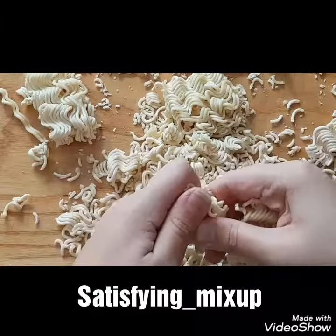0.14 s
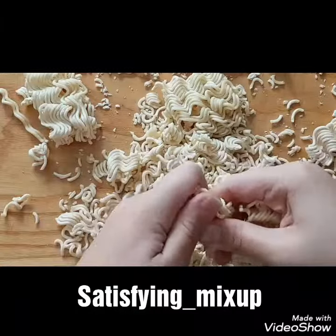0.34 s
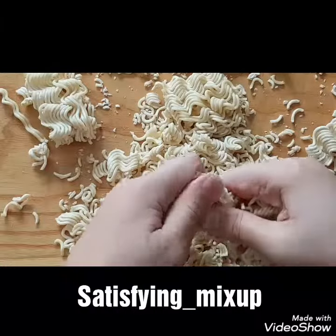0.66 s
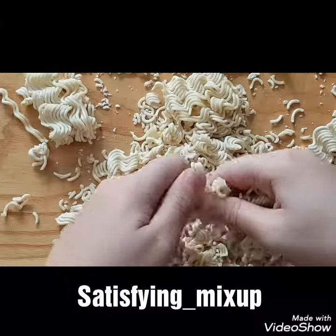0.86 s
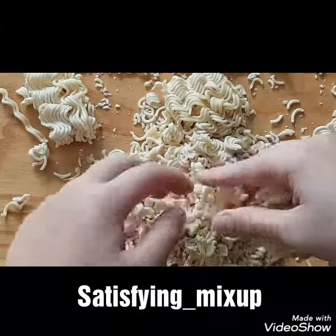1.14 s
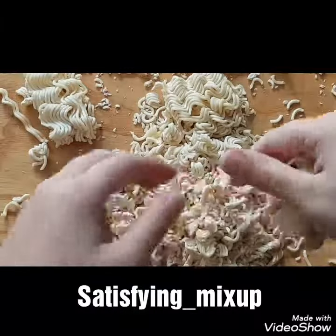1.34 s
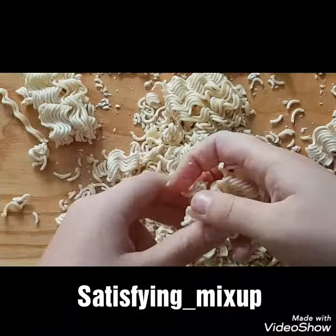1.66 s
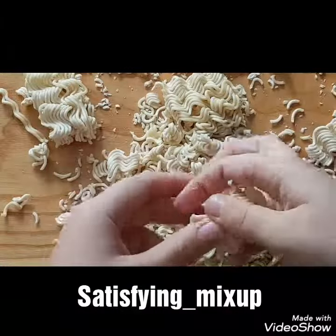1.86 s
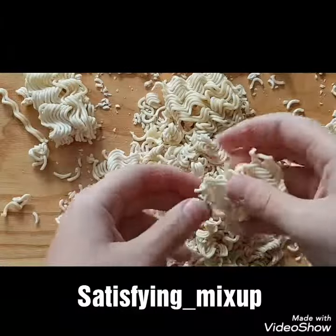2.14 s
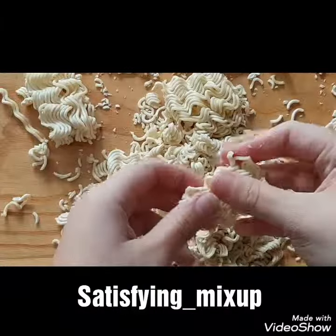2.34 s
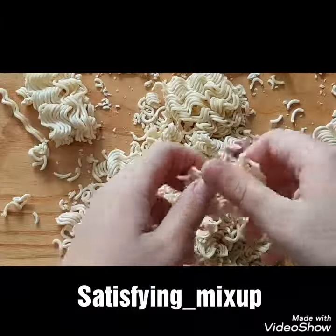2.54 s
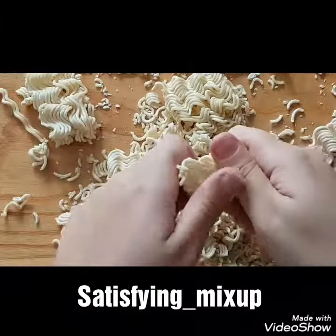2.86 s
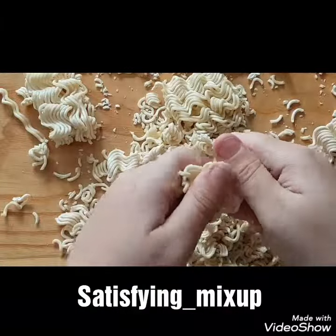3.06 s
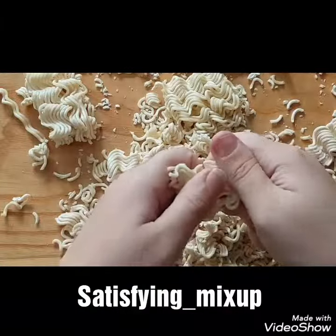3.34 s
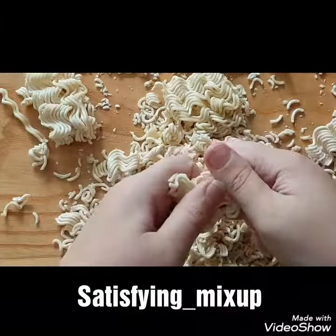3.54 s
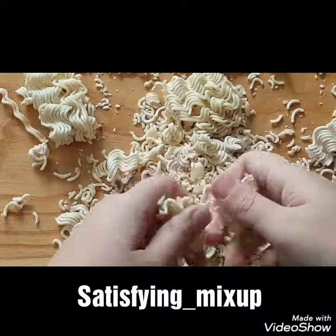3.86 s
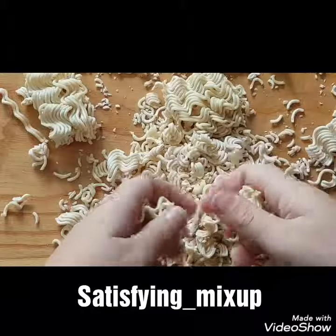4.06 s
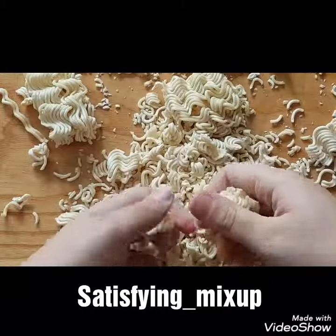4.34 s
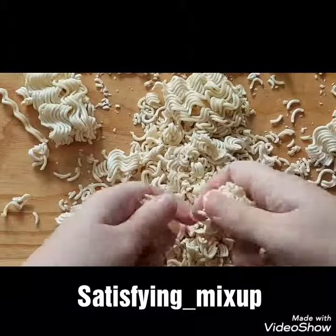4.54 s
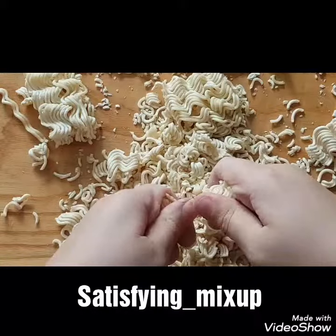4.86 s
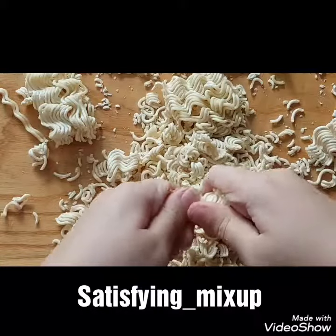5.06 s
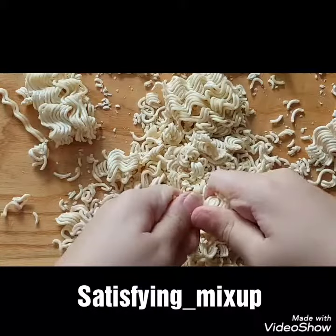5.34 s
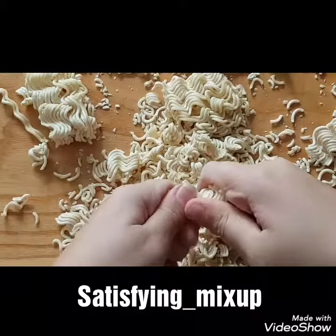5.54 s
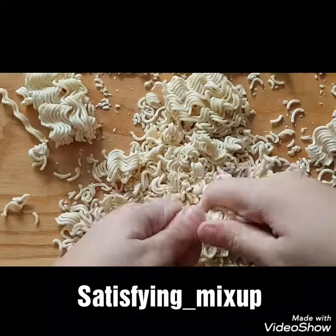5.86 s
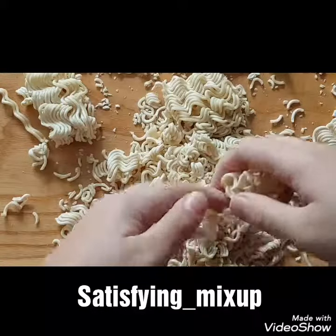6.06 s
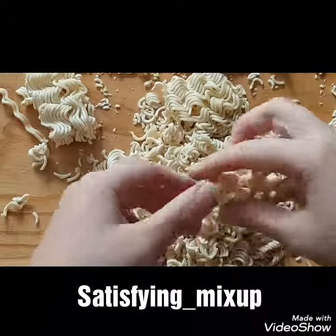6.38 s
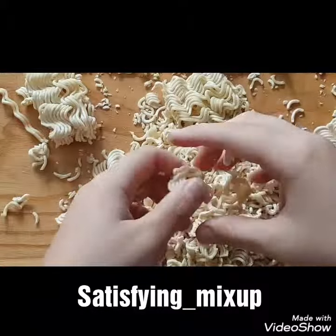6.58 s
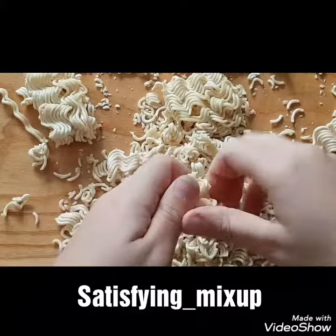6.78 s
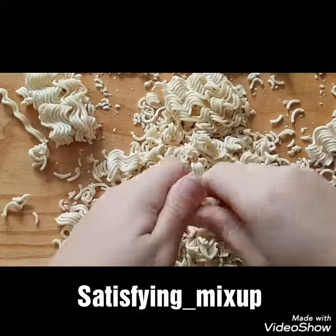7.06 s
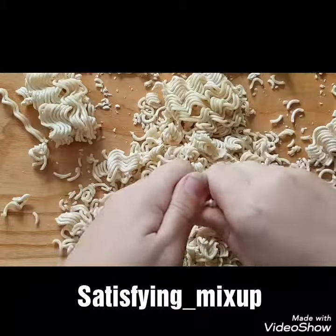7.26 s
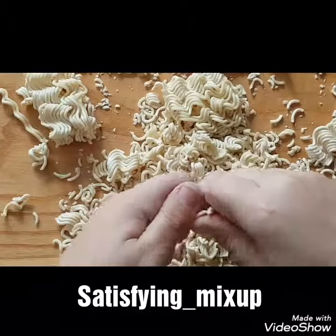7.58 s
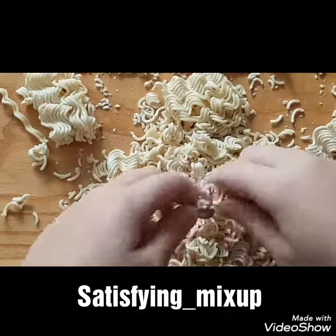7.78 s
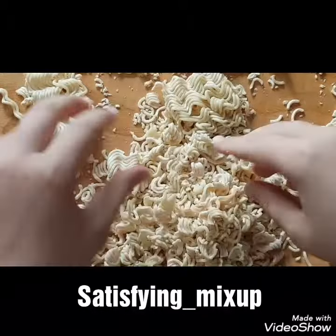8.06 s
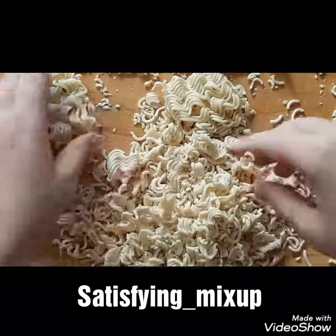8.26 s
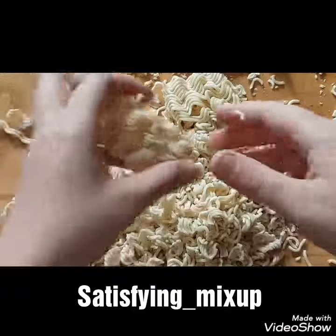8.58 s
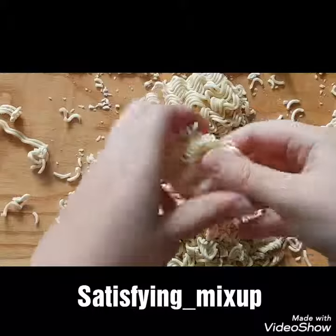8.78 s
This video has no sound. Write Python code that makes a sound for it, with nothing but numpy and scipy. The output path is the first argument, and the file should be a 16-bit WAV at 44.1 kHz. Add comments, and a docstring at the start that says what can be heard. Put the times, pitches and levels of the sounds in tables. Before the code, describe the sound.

Dry noodle strands crack between fingertips with bright, short snaps and gritty crumb crackle. Busy crunching in the first second fades to light pattering; later bursts are separated by soft grinding lulls. One strong snap stands out midway. Loose bits tick on the heap and faintly ring the tabletop, with a few soft thuds and scrapes. Close phone microphone, small furnished room, low background hush, centred sound.

```python
"""Faint crumb crackle in a quiet room, at once broken by snaps: two hands break and crumble a block of
dry instant noodles just above a wooden table, close to a phone.
Each fracture is a run of tiny slips that rings the strand, spits treble and jolts the fingers.
Crumbs are streams of noise bursts that crackle between the fingertips, with larger ones crunching.
Pieces tick on the heap and ring the table modes, crumbs trickle after them; dull thuds, a knock and
scrapes on the wood are swells of dense noise bursts."""
import sys
import numpy as np
from scipy import signal
from scipy.fft import rfft, irfft
from scipy.io import wavfile
from scipy.ndimage import uniform_filter1d

SR = 44100
rng = np.random.default_rng(int(sys.argv[2]) if len(sys.argv) > 2 else 0)


def file_out(sig):
    """Save sig as 16-bit WAV at sys.argv[1]."""
    # one column per channel
    cols = np.atleast_2d(sig).T
    # limit, then scale
    lim = np.clip(cols, -1, 1)
    pcm = np.round(lim * 32767).astype(np.int16)
    wavfile.write(sys.argv[1], SR, pcm)


N = 393372
TIME_S = np.arange(N) / SR

# strand breaks: t/s, ring rms over 5 ms/dB, crack re ring/dB, tear length/s
BREAKS = [(0.051, -50, 3.5, 0.00024), (0.0838, -36.5, -2.5, 0.00035), (0.1712, -40.5, -6.5, 0.00036),
          (0.199, -47, -8, 0.00041), (0.2649, -50, 1, 0.000046), (0.286, -39.5, -13, 0.00035),
          (0.2985, -36.5, 2.5, 0.00056), (0.3091, -28, -1, .0019), (0.3186, -34.5, -4, 0.00047),
          (0.549, -32, -20, 0.00053), (0.5531, -35.5, -29, 0.00052), (0.7199, -35, -12, 0.00062),
          (0.7518, -40.5, -11, 0.0016), (0.7894, -45, -6, 0.00059), (3.1376, -44, -14.5, 0.00054),
          (3.2734, -33.5, -1.5, 0.00094), (3.328, -47, -20, 0.000082), (3.4353, -40.5, -15, 0.000069),
          (3.5487, -47.5, -11, 0.00018), (3.607, -37.5, -11.5, 0.00078), (4.8638, -44.5, -8, 0.000035),
          (5.01, -19.5, -17.5, 0.00025), (5.0121, -30.5, -12, 0.00021), (5.0406, -34.5, -5, 0.00011),
          (5.0515, -41.5, -9, 0.00032), (5.205, -38.5, -9, 0.00047), (5.2215, -35, -30, 0.00022),
          (5.4832, -35.5, -13, .00004), (5.4977, -36, -12, 0.00017), (5.5273, -32.5, -13, 0.00017),
          (5.567, -38, -18, 0.00017), (5.6963, -45.5, -20, .0001), (7.383, -43.5, -11.5, .0001),
          (7.3966, -34, -5, 0.0012), (7.399, -31.5, -6.5, 0.0011), (7.4052, -33.5, -19, 0.00025),
          (7.436, -38.5, -10.5, 0.00063), (7.6247, -38.5, -19, 0.00082), (8.2663, -34.5, -15, 0.00061)]
# pieces let go over the table: t/s, level before mix gains/dB, loose crumbs re that level/dB
DROPPED_PIECES = [(1.071, -50, -11.5), (1.19, -51, -2), (1.256, -45.5, -7.5), (2.024, -47.5, -17),
                  (3.983, -55, -10), (4.239, -50.5, -16), (4.462, -57.5, -5), (6.258, -48, -8.5),
                  (6.33, -52, -7.5), (6.48, -55.5, -15), (6.685, -51, -12), (6.725, -45.5, -7.5),
                  (7.934, -56, -16), (8.001, -53, -1.5), (8.056, -52.5, -6), (8.404, -51, -20),
                  (8.469, -54.5, -5.5)]
# nominal table-top modes: f/Hz, level/dB, t60/s
TABLE_MODES = [(318.8, 2, 0.2), (250, -9.5, 0.084), (403, -3.5, 0.037), (517, -9.5, 0.058),
               (730, -16.5, 0.083), (814, -10, 0.047), (958, -15.5, 0.1), (1182, -15, 0.07),
               (1480, -16.5, 0.048), (1700, -24, 0.064)]
# larger crumbs crushed between the fingertips: t/s, level before mix gain/dB
CRUSHED_CRUMBS = [(0.25, -45), (0.3597, -34.5), (0.4343, -32.5), (0.5184, -38), (0.588, -34.5),
                  (0.6481, -41), (0.6952, -30), (0.824, -36), (0.852, -39), (1.48, -40.5), (1.5463, -43),
                  (1.6075, -46.5), (2.13, -47), (3.4523, -34.5), (5.1578, -40.5), (5.3844, -38.5),
                  (6.0354, -42), (7.2982, -43), (7.646, -40), (8.8487, -43.5)]
# dull thuds, a knock (8.4 s) and scrapes on the wood: t/s, length/s, level before mix gain/dB
WOOD_CONTACTS = [(1.508, 0.034, -48), (1.601, 0.073, -58), (7.767, 0.094, -58), (8.4, 0.021, -46),
                 (8.45, 0.2, -60)]
# fingers tighten on the crumbs, then ease off: start t/s, build-up/s, crackle level before mix gain/dB
GRIP_SQUEEZES = [(0.0, 0.065, -72.5), (0.32, 0.063, -59.5), (0.5, .2, -56), (0.9, 0.063, -62),
                 (1.78, 0.089, -72), (3.3, 0.11, -73.5), (3.9, 0.36, -72.5), (5.0, .22, -71),
                 (5.6, 0.14, -70), (6.0, 0.29, -68), (7.6, 0.19, -66), (8.8, 0.13, -71.5)]

# treble spectrum of a strand cracking: f/Hz, relative density/dB
CRACK_SPECTRUM = [(1500, -27), (3500, -2), (5200, -5), (7200, 4.5), (9000, -2), (11000, -2), (14500, 0),
                  (16200, -17.5)]
# low spectrum of the jolt in the fingers: f/Hz, relative density/dB
JOLT_SPECTRUM = [(60, -15.5), (150, -3), (280, -1.5), (600, -6.5), (1300, -7), (2200, -13), (5000, -27)]
# hollow crumb rasp spectrum: f/Hz, relative density/dB
CRUMB_SPECTRUM = [(120, -8.5), (350, -3.5), (1500, -7.5), (2200, -4.5), (2750, -2), (3800, -6), (5200, -16),
                  (9000, -19.5), (16000, -32)]
# fine, bright crumb spectrum: f/Hz, relative density/dB
FIZZ_SPECTRUM = [(2000, -23), (4000, -6), (7000, 3.5), (13500, 0), (16200, -20)]
# noodle-curl rattle spectrum: f/Hz, relative density/dB
CURL_SPECTRUM = [(600, -28), (1600, -14.5), (2300, -1.5), (3100, 0), (4300, -2), (5400, -20.5),
                 (12000, -42)]
# spectrum of the thuds, knock and scrapes on the wood: f/Hz, relative density/dB
WOOD_SPECTRUM = [(60, 0), (140, 5.5), (400, 5.5), (900, -0.5), (1600, 1), (3600, -5.5), (4800, -29),
                 (16000, -29)]
# room-tail spectrum: f/Hz, relative density/dB
ROOM_SPECTRUM = [(700, -0.5), (3000, -5.5), (15000, -2)]
# room noise and microphone hiss spectrum: f/Hz, relative density/dB
HUSH_SPECTRUM = [(20, -8.5), (35, -19), (100, -3.5), (200, -10), (420, -13.5), (1100, -23), (2700, -33),
                 (5000, -38.5), (14000, -41.5), (16500, -51.5)]

HUSH_DB, TOP_HZ = -70.5, 16000
EASE_T60_S, HOLDING_DB = 1.45, -80.5  # release of a squeeze; crackle of a resting grip before mix gain
# typical break: louder ones are thicker strands, ring lower; long tears shatter smaller, ring higher
RING_HZ, TYPICAL_DB, TYPICAL_CRACK_DB, TYPICAL_TEAR_S = 3286, -36, -8.5, 0.00037
RING_FALL_OCT_PER_DB, RING_RISE_OCT_PER_DOUBLING, RING_SCATTER_OCT = 0.03, 0.071, 0.03
# jolt re ring; grows per doubling of tear length and per dB of crack
JOLT_DB, JOLT_DB_PER_DOUBLING, JOLT_DB_PER_CRACK_DB = -8, 2.5, 0.18


def undb(db):
    """Convert dB to amplitude."""
    return 10 ** (np.asarray(db) / 20)


def unit(x):
    """Scale to an energy of one."""
    return x / np.sqrt(np.sum(x ** 2) + 1e-18)


def add(track, t_s, sound):
    """Mix a sound in at a time."""
    i = max(int(t_s * SR), 0)
    track[i:i + len(sound)] += sound[:N - i]


def response(points, size=2048):
    """Minimum-phase impulse response of a spectrum, via a folded cepstrum; energy one."""
    hz, db = np.transpose(points)
    f_hz = np.maximum(np.fft.rfftfreq(size, 1 / SR), 1)
    magnitude = undb(np.interp(np.log(f_hz), np.log(hz), db))
    cepstrum = irfft(np.log(magnitude))
    cepstrum[1:size // 2] *= 2
    cepstrum[size // 2 + 1:] = 0
    return unit(irfft(np.exp(rfft(cepstrum))))


def through(x, impulse_response):
    """Convolve, keeping the input length."""
    return signal.fftconvolve(x, impulse_response)[:len(x)]


def band(x, low_hz, high_hz):
    """Keep one band of a sound."""
    edges_hz = [low_hz, min(high_hz, SR / 2 - 1)]
    return signal.sosfilt(signal.butter(2, edges_hz, "band", fs=SR, output="sos"), x)


def fade(t_s, t60_s):
    """Exponential decay, 60 dB per t60."""
    return np.exp(-np.log(1000) * t_s / t60_s)


def mode(t_s, hz, t60_s):
    """One struck resonance: a decaying sine."""
    return np.sin(2 * np.pi * hz * t_s) * fade(t_s, t60_s)


def walk(rate_hz):
    """Random levels, held and slewed; spread near one."""
    hold = int(SR / rate_hz)
    steps = np.repeat(rng.standard_normal(N // hold + 1), hold)
    return uniform_filter1d(steps, hold)[:N]


def grains(per_s, spread_db):
    """Random impulses of unit power: many small ones, a few large."""
    size = undb(spread_db * np.minimum(rng.exponential(size=N), 4))
    hits = rng.random(N) < per_s / SR
    return unit(hits * size * rng.choice([-1, 1], N)) * np.sqrt(N)


def roughen(impulses, t60_s, size=1024):
    """Turn each impulse into its own short burst of noise."""
    power = through(impulses ** 2, fade(TIME_S[:size], t60_s) ** 2)
    return np.sqrt(abs(power)) * rng.standard_normal(len(impulses))


def grit(per_s, spread_db, t60_s):
    """A stream of rough contacts with unit power."""
    return unit(roughen(grains(per_s, spread_db), t60_s)) * np.sqrt(N)


def burst(spectrum, t60_s, size=2048):
    """A short puff of noise from one rough contact; energy one."""
    noise = rng.standard_normal(size) * fade(TIME_S[:size], t60_s)
    return unit(through(noise, response(spectrum)))


def hush():
    """Steady low room noise and microphone hiss: filtered white noise."""
    return undb(HUSH_DB) * through(rng.standard_normal(N), response(HUSH_SPECTRUM, size=8192))


def grip():
    """Crackle level in dB: each squeeze builds up steadily and dies away."""
    power = undb(HOLDING_DB) ** 2
    for t_s, build_s, db in GRIP_SQUEEZES:
        build = np.clip((TIME_S - t_s) / build_s, 0, 1)
        ease = fade(np.maximum(TIME_S - t_s - build_s, 0), EASE_T60_S)
        power = power + (undb(db) * build * ease) ** 2
    return 10 * np.log10(power)


def crumbs(crumb_db=0.5, fizz_db=-7, tick_db=-12, wobble_db=2, wobble_hz=30):
    """Crumbs grind in fits and starts: hollow rasp, brighter fine ticks, now and then a curl breaking."""
    rasp = through(grit(310, 3.5, 0.0087), response(CRUMB_SPECTRUM))
    fizz = through(grit(140, 5.3, 0.022), response(FIZZ_SPECTRUM))
    ticks = through(grit(22, 4, 0.004), response(CURL_SPECTRUM))
    pressure_db = grip() + wobble_db * walk(wobble_hz)
    return (rasp + undb(fizz_db) * fizz + undb(tick_db) * ticks) * undb(pressure_db + crumb_db)


def fracture(hz, crack_db, jolt_db, tear_s, ring_t60_s=0.0035, curl_db=-8, curl_t60_s=0.016,
             crack_t60_s=0.0099, strain_db=-19, strain_t60_s=0.029, count=14, size=2048):
    """One break: small slips around a main one, which comes a quarter of the way into the sound."""
    t_s = TIME_S[:size]
    main = size // 4
    slips = np.zeros(size)
    offset = rng.normal(0.3, 1.5, count) * tear_s * SR
    place = np.clip(main + offset, 0, size - 1).astype(int)
    # short tear: nearly one clean slip; long tear: a ragged run
    slips[place] = 0.4 * min(tear_s / 0.0006, 1) ** 2 * rng.standard_normal(count)
    slips[main] = 1

    # the strand rings briefly between the fingers; the curls around it rattle
    ring = unit(band(through(slips, mode(t_s, hz, ring_t60_s)), 1400, 7000))
    rattle = unit(through(roughen(slips, curl_t60_s), response(CURL_SPECTRUM)))

    # fine cracks gather just before the strand gives way
    gathering = fade(abs(t_s - t_s[main]), strain_t60_s) * (t_s < t_s[main])
    strain = unit(through(rng.standard_normal(size) * gathering, response(CRACK_SPECTRUM)))
    crack = unit(through(slips, burst(CRACK_SPECTRUM, crack_t60_s))) + undb(strain_db) * strain

    # every slip pushes the same way, so the low jolt adds up; then the fingers spring back
    jolt = unit(band(through(abs(slips), response(JOLT_SPECTRUM)), 45, 4000))
    return ring + undb(curl_db) * rattle + undb(crack_db) * crack + undb(jolt_db) * jolt


def snaps():
    """All strand breaks; loudness, tear and crack set the pitch of the ring and the jolt."""
    out = np.zeros(N)
    span = np.sqrt(0.005 * SR)  # unit energy to unit rms over 5 ms
    for t_s, db, crack_db, tear_s in BREAKS:
        doublings = np.log2(tear_s / TYPICAL_TEAR_S)
        octaves = RING_RISE_OCT_PER_DOUBLING * doublings
        octaves -= RING_FALL_OCT_PER_DB * (db - TYPICAL_DB)
        octaves += RING_SCATTER_OCT * rng.normal()
        jolt_db = JOLT_DB + JOLT_DB_PER_DOUBLING * doublings
        jolt_db += JOLT_DB_PER_CRACK_DB * (crack_db - TYPICAL_CRACK_DB)
        sound = fracture(RING_HZ * 2 ** octaves, crack_db, jolt_db, tear_s)
        add(out, t_s - (len(sound) // 4) / SR, span * undb(db) * sound)
    return out


def splinters(splinter_db=-19.5, t60_s=0.17, size=4096):
    """Weakened strands go on splitting for a moment after each break, more so after a long tear."""
    power = np.zeros(N)
    decay = fade(TIME_S[:size], t60_s)
    for t_s, db, crack_db, tear_s in BREAKS:
        level = undb(db + crack_db + splinter_db)
        add(power, t_s, (level * decay) ** 2 * min(tear_s / 0.00042, 2))
    return np.sqrt(power) * through(grit(1300, 14, 0.013), response(CRACK_SPECTRUM))


def crunches(crunch_db=11, fizz_db=-9, length_s=0.012, rest_db=-10, t60_s=0.0032, rest_t60_s=0.016, count=4):
    """A crumb gives way with a sharp tick, then collapses in a few softer ones."""
    out = np.zeros(N)
    for t_s, db in CRUSHED_CRUMBS:
        tick = burst(CRUMB_SPECTRUM, t60_s) + undb(fizz_db) * burst(FIZZ_SPECTRUM, t60_s)
        add(out, t_s, undb(db + crunch_db) * tick)
        for _ in range(count):
            softer = undb(db + crunch_db + rest_db) * burst(CRUMB_SPECTRUM, rest_t60_s)
            add(out, t_s + length_s * rng.random(), softer)
    return out


def table_ring(upper_db=0, scatter_db=3, push_s=0.00044, size=10000):
    """Table top struck at a random spot; a harder contact (higher upper_db) brings out the upper modes."""
    t_s = TIME_S[:size]
    first_hz, _, first_t60_s = TABLE_MODES[0]
    out = mode(t_s, first_hz, first_t60_s)
    for hz, db, t60_s in TABLE_MODES[1:]:
        mode_db = db + scatter_db * rng.normal() + upper_db * (hz > 500)
        struck = mode(t_s, hz * rng.normal(1, 0.017), t60_s)
        out = out + rng.choice([-1, 1]) * undb(mode_db) * struck
    return out * (1 - np.exp(-t_s / push_s))  # soft onset


def drops(knock_db=-3, upper_db=-3, tick_db=17, tick_t60_s=0.017):
    """A piece ticks on the heap and knocks the table."""
    out = np.zeros(N)
    for t_s, db, _ in DROPPED_PIECES:
        add(out, t_s, undb(db + knock_db) * table_ring(upper_db))
        add(out, t_s, undb(db + tick_db) * burst(CRUMB_SPECTRUM, tick_t60_s))
    return out


def showers(hum_db=-6.5, patter_db=-5, dust_db=-15, t60_s=0.61, size=20000, count=3):
    """Loose crumbs trickle after each piece, patter on the table and keep it humming at a few spots."""
    hum_power, patter_power = np.zeros(N), np.zeros(N)
    for t_s, db, loose_db in DROPPED_PIECES:
        flow = undb(db) * fade(TIME_S[:size], t60_s)
        add(hum_power, t_s, flow ** 2)
        add(patter_power, t_s, (flow * undb(loose_db)) ** 2)
    hum = np.zeros(N)
    for _ in range(count):
        hits = grains(120, 3.8) * np.sqrt(hum_power / count)
        hum += through(hits, unit(table_ring()))
    patter = undb(patter_db) * through(grit(300, 6.8, 0.03), response(CRUMB_SPECTRUM))
    dust = undb(dust_db) * through(grit(87, 2.4, 0.011), response(FIZZ_SPECTRUM))
    return undb(hum_db) * hum + np.sqrt(patter_power) * (patter + dust)


def wood_contacts(contact_db=1):
    """Dull thuds, a knock and scrapes on the wood: dense noise bursts that swell quickly and die away."""
    envelope = np.zeros(N)
    for t_s, length_s, db in WOOD_CONTACTS:
        done = np.linspace(0, 1, int(length_s * SR))
        add(envelope, t_s, undb(db + contact_db) * np.minimum(10 * done, 1) * (1 - done))
    return envelope * through(grit(1100, 6.6, 0.032), response(WOOD_SPECTRUM))


def room(x, wet_db=-19, t60_s=0.18, first_s=0.0077, size=16000):
    """A small furnished room answers faintly: a decaying noise tail after a short gap."""
    t_s = TIME_S[:size]
    noise = rng.standard_normal(size) * fade(t_s, t60_s) * (t_s > first_s)
    tail = unit(through(noise, response(ROOM_SPECTRUM)))
    return x + undb(wet_db) * through(x, tail)


def scene():
    """One microphone hears it all; both channels carry the same sound."""
    hands = crumbs() + snaps() + splinters() + crunches()
    table = drops() + showers() + wood_contacts()
    mono = room(hands + table) + hush()
    return np.array([mono, mono])


def record(dry):
    """The phone cuts the top: a steep elliptic low-pass."""
    return signal.sosfilt(signal.ellip(8, 0.2, 70, TOP_HZ, fs=SR, output="sos"), dry)


dry = scene()
out = record(dry)
file_out(out)
```